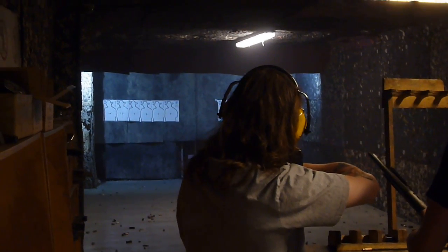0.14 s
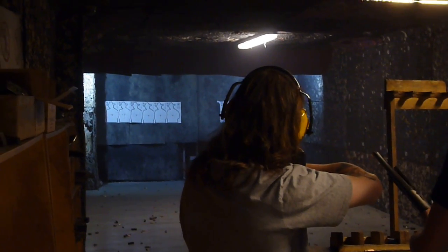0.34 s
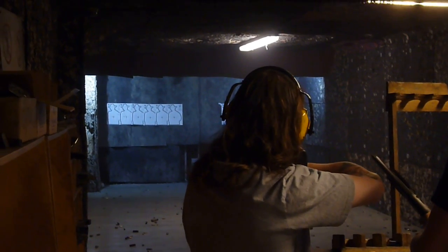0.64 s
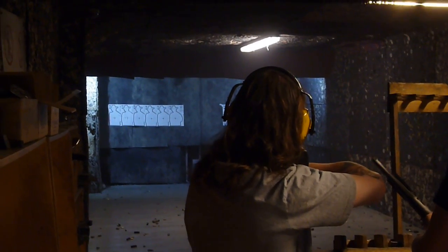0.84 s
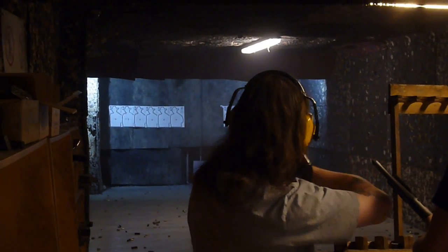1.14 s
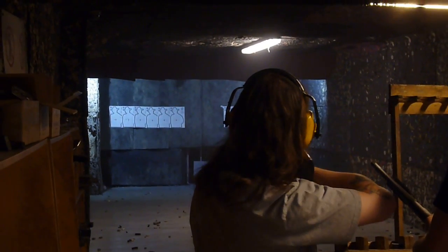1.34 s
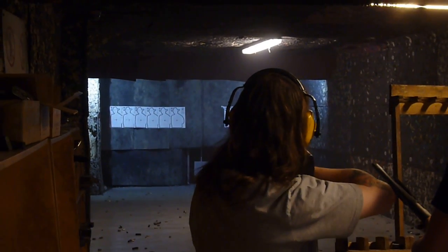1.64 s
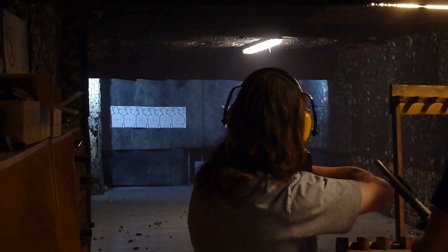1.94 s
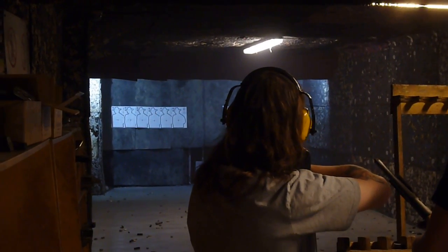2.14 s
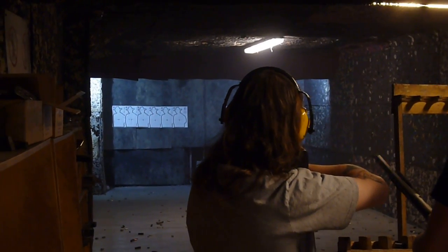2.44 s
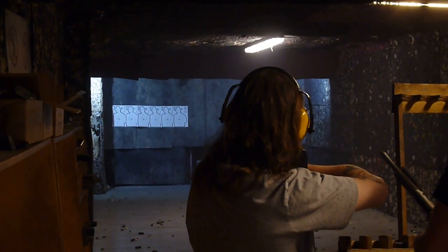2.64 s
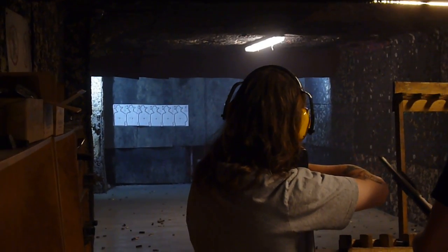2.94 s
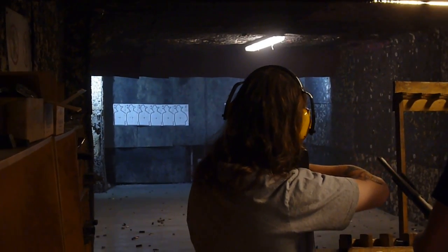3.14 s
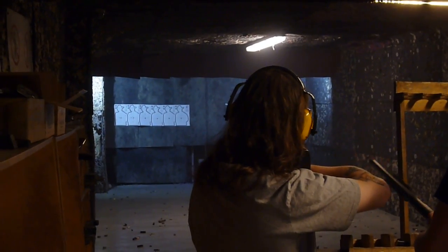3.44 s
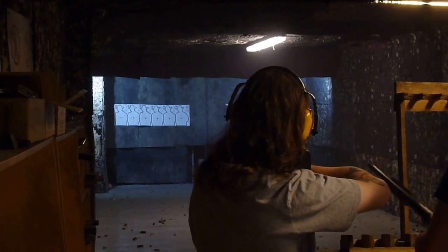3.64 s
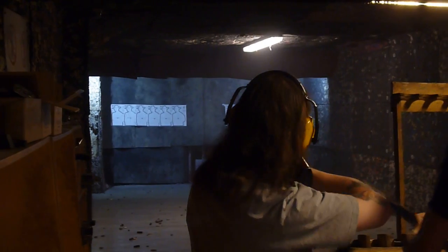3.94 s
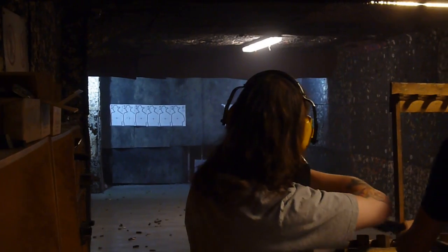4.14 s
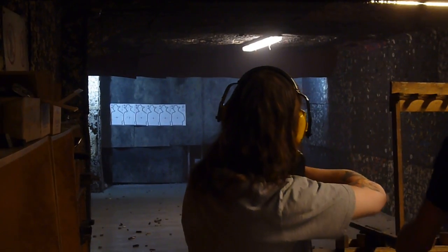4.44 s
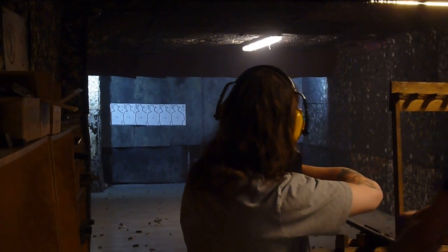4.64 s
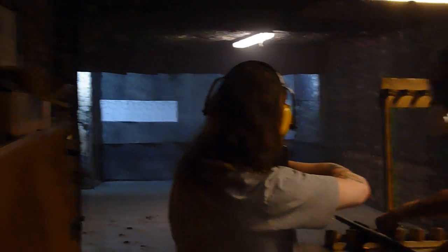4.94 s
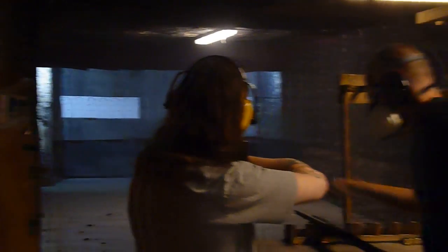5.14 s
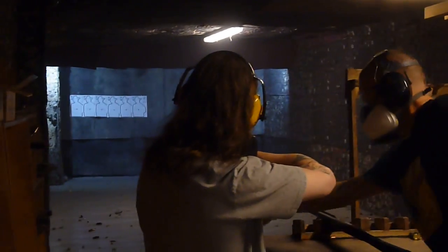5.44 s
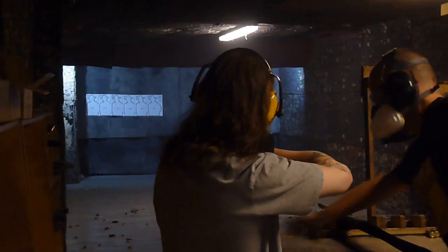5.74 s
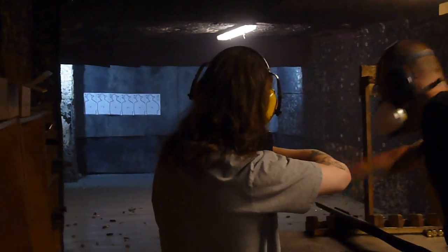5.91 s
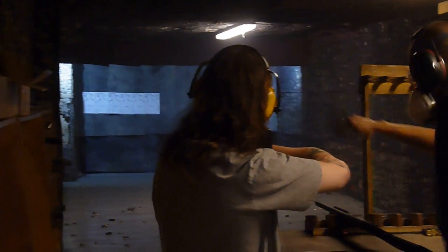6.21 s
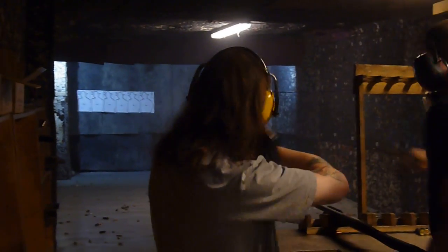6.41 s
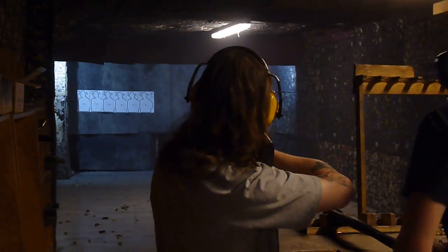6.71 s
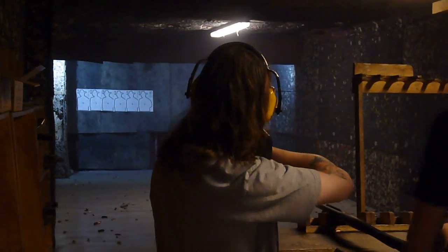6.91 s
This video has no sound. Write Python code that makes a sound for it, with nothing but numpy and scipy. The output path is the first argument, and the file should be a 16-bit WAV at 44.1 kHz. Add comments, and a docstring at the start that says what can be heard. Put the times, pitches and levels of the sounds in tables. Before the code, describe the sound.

In a low concrete shooting range, light metal ticks lead into two overlapping gunshots around one second. Clacks and bouncing cases follow, then three single shots, each with a short boxy echo. Ventilation rumbles beneath. A small overloaded microphone clips the blasts, ducks everything afterward and slowly recovers, with faint hiss and dull treble.

```python
"""Shooting range, five shots

Five shots from two stands in a low concrete range, among bouncing cases and the clack of gun parts.
Shots are banded noise with standing waves; clacks are bursts of tiny contacts with ringing metal.
Ventilation rumbles underneath as wavering bands of noise.
The blast drives a small microphone into its rails; a bass cut, a gain control that recovers slowly
and a faint hiss follow."""
import sys
import numpy as np
from scipy import signal
from scipy.io import wavfile

SR = 44100
rng = np.random.default_rng(int(sys.argv[2]) if len(sys.argv) > 2 else 0)


def transcribe(u):
    """Save the signal u as a 16-bit wav file named by the first command-line argument.

    u: samples, shape (n,) or (channels, n), limited to [-1, 1]; the rate is SR.
    q: integer samples, one column per channel.
    """
    v = np.clip(np.atleast_2d(u).T, -1, 1)
    q = np.round(v * 32767).astype(np.int16)
    wavfile.write(sys.argv[1], SR, q)


N = 311787

# The shots. Each row: start in seconds, level in dB above the microphone's rails, stand (0 or 1).
SHOTS = [(0.9552, 21, 0), (1.085, 15.5, 1), (3.7578, 16.5, 0), (4.999, 14.5, 1), (6.279, 19, 0)]
# How the range answers a blast. Each row: frequency in Hz, relative level in dB per Hz,
# 60 dB decay time in seconds, build-up in seconds.
RANGE_ANSWER = [(29, -20.5, 1.9, 0.024), (55, -16, 0.68, 0.019), (81, -8, 1.73, 0.023),
                (122, -3, 1.03, 0.016), (203, 0, 0.66, 0.019), (210, -5.5, 0.61, 0.037),
                (286, -4.5, 0.73, 0.032), (403.5, 7.5, 0.43, 0.035), (536, 9, 0.3, 0.061),
                (697, 4.5, 0.28, 0.037), (972, -3, 0.28, 0.014), (2080, -9, 0.19, 0.0078),
                (4500, -21, 0.24, 0.00027), (9300, -21, 0.16, 0.00085)]
# Standing waves of the range. Each row: frequency in Hz, level in dB, 60 dB decay time in seconds.
STANDING_WAVES = [(36.2, -34.5, 1.9), (82.33, -9, 1.45), (142.3, -18, 1.2), (185.8, -15, 0.97),
                  (268, -22, 0.51), (305.3, -18.5, 0.82), (374, -21.5, 0.93), (400, -12.5, 0.58),
                  (458.8, -11.5, 0.62)]
# Cases and gun parts striking. Each row: start in seconds, level in dB, brightness in dB per octave,
# pitch struck in Hz, ringing in dB, 60 dB decay time in seconds.
CLACKS = [(0.123, -37.5, 5.5, 3260, 4.5, 0.25), (0.194, -29.5, 5, 2920, -1, 0.21),
          (0.2075, -22, 1.5, 3020, 5, 0.06), (0.274, -41, 6, 4900, -4, 0.044),
          (0.328, -38, 3, 4940, 2, 0.13), (0.377, -30.5, -5, 1270, 2.5, 0.065),
          (0.616, -30.5, 4, 4900, -7, 0.33), (0.636, -17.5, 4, 2100, 0, 0.086),
          (0.728, -31.5, 9, 3500, 6, 0.1), (0.748, -31, 12.5, 6300, -9, 0.11),
          (0.807, -27, 1.5, 3460, 0, 0.078), (1.498, -20.5, -4.5, 1900, 22, 0.055),
          (1.5928, -1, -6, 1280, -3, 0.11), (1.658, -22, -6, 1290, -5, 0.14),
          (1.901, -10.5, -4.5, 1920, 6.5, 0.099), (1.975, 2.5, -0.5, 3430, -7, 0.12),
          (2.04, -22.5, -5, 1280, 2, 0.25), (2.107, -17.5, -0.5, 2350, 2, 0.061),
          (2.256, -14, -2.5, 1450, 7, 0.081), (2.339, -14.5, -1.5, 2720, 5.5, 0.21),
          (2.4692, -15.5, -0.5, 3360, 6.5, 0.17), (2.5555, -16.5, -4, 2260, 1, 0.19),
          (2.652, -25, 0.5, 3080, 0.5, 0.18), (2.816, -35, 0.5, 2200, 7, 0.099),
          (2.867, -41.5, 1.5, 4900, -2, 0.08), (2.932, -39, -1.5, 2300, -1, 0.085),
          (3.057, -42, -3, 2100, 0, 0.43), (3.127, -24, 5, 3820, 3, 0.14), (3.354, -30, -2, 1300, -6, 0.11),
          (3.47, -41, 2, 2300, -4, 0.17), (3.521, -14.5, 3.5, 1960, -4, 0.12),
          (3.5922, -18.5, 2.5, 2060, -11, 0.13), (3.7242, -26.5, 1, 2040, -5, 0.14),
          (4.232, -12, -2.5, 6600, -4, 0.15), (4.31, -8.5, -2.5, 3430, -3, 0.13),
          (4.389, -11.5, -0.5, 730, 13, 0.17), (4.506, -11, -3, 795, 2, 0.18),
          (4.593, -32, 5.5, 2250, 9, 0.16), (4.769, -33.5, 5, 4200, 12, 0.029),
          (4.832, -31, 0, 2220, -1, 0.4), (5.454, -11.5, 4, 2170, 4.5, 0.084),
          (5.823, -29.5, 8, 5000, -9, 0.12), (5.933, -33, 7, 2130, 5, 0.06),
          (6.146, -9.5, 2.5, 1730, 0.5, 0.1), (6.213, -31, 1, 1760, -5, 0.11),
          (6.574, -22, -23, 1280, -0.5, 0.31), (6.699, -7, -5, 2540, 10, 0.13),
          (6.801, -4.5, -0.5, 4200, 8, 0.17)]
# What the metal parts ring with. Each row: frequency in Hz, level in dB, 60 dB decay time in seconds.
METAL_MODES = [(535, 0.5, 0.2), (720, -8.5, 0.099), (1263, -9, 0.27), (1400, -12, 0.45), (1788, -11, 0.47),
               (2050, -6, 0.033), (2245, -10, 0.34), (2625, -18, 0.42), (3475, -13, 0.098),
               (3790, -15, 0.16), (4980, -6, 0.031), (6500, -3, .08), (7400, -14, 0.073)]
# Bands of the contact noise. Each row: low edge in Hz, high edge in Hz, nominal centre in Hz, level in dB.
GRIT_BANDS = [(600, 2000, 1100, -3), (1600, 4500, 2700, 0), (3500, 9000, 5700, -3)]
# Colour of the ventilation. Each row: frequency in Hz, relative level in dB per Hz.
VENT_COLOUR = [(26, -29.5), (45, -1.5), (54, 1), (103, 14.5), (229, -10), (310, -13.5), (361, -10.5),
               (568, -10), (1240, -20.5), (2100, -22), (3300, -36), (6730, -34), (8000, -43.5),
               (10400, -67), (17600, -120)]
# How the ventilation rumble wavers. Each row: time in seconds, level in dB.
VENT_LEVEL = [(0, -34.5), (.5, -30), (0.901, -29.5), (2.2, -24.5), (2.8, -28), (3.1, -32), (3.399, -29.5),
              (3.698, -28), (4.799, -25), (6, -27), (7.07, -24)]

# Treble comes back from the far wall.
FAR_WALL_S, FAR_WALL_DB, FAR_WALL_HZ = 0.049, -10.5, 900
# Capsule sag: size, build-up, half swing, holding time, letting-go time.
SAG_DB, SAG_RISE_S, SAG_SWING_S, SAG_HOLD_S, SAG_FADE_S = 0.5, 0.0025, 0.1091, 0.14, 0.022
# The burst of contacts comes in clumps.
CLUMPS_PER_S, CLUMP_SPREAD_DB = 350, 1.5
# Modes away from the struck pitch ring less; every strike also has its own chance.
AWAY_DB_PER_OCTAVE, AWAY_MAX_DB, STRIKE_SPREAD_DB = 18, 21.0, 2
RING_SHARPNESS = 16  # grows with the ring's decay time
RAIL = 12.7  # largest swing of the microphone, full scale = 1
BASS_CUT_HZ, BASS_CUT_Q = 237, 1.303
PREAMP_TOP, PREAMP_KNEE = 8.03, 12
# The slow leak past the bass cut.
LEAK_LOW_HZ, LEAK_TOP_HZ, LEAK_SHARE = 5.1, 22.4, 0.78
HOLD_DB, RECOVER_DB_PER_S, ATTACK_S, AHEAD_S = -10.5, 19, 0.0004, 0.0036
HISS_DB = -62.5
NOTCH_HZ, NOTCH_WIDTH_HZ = 4390, 70
CAPSULE_TOP_HZ, TOP_CUT_HZ = 7300, 8850
OFFSET = 0.018


def shots():
    """Each stand has one answer of the range, heard again at every shot; the blast also sags the capsule."""
    out = np.zeros(N)
    t = np.arange(2 * SR) / SR
    answers = range_answer(t)
    sag = capsule_sag(t)
    for start, over_db, stand in SHOTS:
        blast = answers[int(stand)] - sag
        add(out, start, RAIL * from_db(over_db) * blast)
    return out


def range_answer(t):
    """Noise bands build up and decay, treble returns from the far wall, and standing waves ring; per stand."""
    answer = 0
    since_wall = np.maximum(t - FAR_WALL_S, 0)
    for hz, noise in bands(len(t), channels=2):
        level_db, t60, rise = at_hz(RANGE_ANSWER, hz)
        wall_gain = from_db(FAR_WALL_DB) * hz / (hz + FAR_WALL_HZ)
        back = wall_gain * swell(since_wall, 0.024, t60)
        answer = answer + from_db(level_db) * (swell(t, rise, t60) + back) * noise
    # The first 100 ms of noise set the level.
    answer /= np.sqrt(np.mean(answer[:, :SR // 10] ** 2, axis=1, keepdims=True))
    phases = rng.uniform(0, 2 * np.pi, (len(STANDING_WAVES), 2, 1))
    for (hz, level_db, t60), phase in zip(STANDING_WAVES, phases):
        answer += from_db(level_db) * swell(t, 0.17, t60) * np.sin(2 * np.pi * hz * t + phase)
    return answer


def capsule_sag(t):
    """The capsule's rest point is pushed down by a blast, swings past the middle and lets go."""
    push = 1 - np.exp(-t / SAG_RISE_S)
    swing = np.cos(np.pi * t / SAG_SWING_S)
    let_go = (1 - np.tanh((t - SAG_HOLD_S) / SAG_FADE_S / 2)) / 2
    return from_db(SAG_DB) * push * swing * let_go


def clacks():
    """Bursts of tiny contacts with a short booth tail, and metal modes; long scrapes start softly."""
    out = np.zeros(N)
    t = np.arange(SR // 3) / SR
    filters = [signal.butter(2, [low, high], "band", fs=SR, output="sos") for low, high, _, _ in GRIT_BANDS]
    for start, level_db, bright, pitch_hz, ring_db, t60 in CLACKS:
        grit = contact_grit(t)
        burst = 0
        for (_, _, hz, db), sos in zip(GRIT_BANDS, filters):
            tilt_db = bright * np.log2(hz / GRIT_BANDS[1][2])  # pivots on the middle band
            burst = burst + from_db(db + tilt_db) * rms_one(signal.sosfilt(sos, grit))
        booth_tail = from_db(-29.0) * swell(t, 0.01, 0.048)
        shape = swell(t, 0.27 * t60 ** 2, t60) + booth_tail
        sound = shape * burst + metal_ring(t, pitch_hz, ring_db, t60)
        add(out, start, from_db(level_db) * sound)
    return out


def contact_grit(t):
    """Tiny contacts of very uneven strength, swelling and thinning in clumps."""
    grit = rng.standard_normal(len(t)) * from_db(7.44 * rng.standard_normal(len(t)))
    clumps = rng.standard_normal(SR // 40)
    clump_db = CLUMP_SPREAD_DB * np.interp(t * CLUMPS_PER_S, np.arange(len(clumps)), clumps)
    return grit * from_db(clump_db)


def metal_ring(t, pitch_hz, ring_db, t60):
    """The metal's modes ring most near the struck pitch."""
    ring = np.zeros(len(t))
    for (hz, mode_db, mode_t60), chance in zip(METAL_MODES, rng.standard_normal(len(METAL_MODES))):
        away_db = min(AWAY_DB_PER_OCTAVE * abs(np.log2(hz / pitch_hz)), AWAY_MAX_DB)
        level_db = ring_db + mode_db - away_db + STRIKE_SPREAD_DB * chance
        damped_t60 = np.sqrt(mode_t60 * t60)  # a short knock is also a damped one
        ring += from_db(level_db) * rough_ring(hz, damped_t60, t)
    return ring


def rough_ring(hz, t60, t):
    """Rattling contact keeps one resonance shaking: a rough band, narrower where it rings long."""
    sharpness = RING_SHARPNESS * (1 + t60 / 0.2)
    r = np.exp(-np.pi * hz / sharpness / SR)
    w = 2 * np.pi * hz / SR
    rough = signal.lfilter([1, 0, -1], [1, -2 * r * np.cos(w), r * r], rng.standard_normal(len(t)))
    return rms_one(rough) * swell(t, 0.00052, t60)


def ventilation():
    """Air noise whose bands waver partly together."""
    air = 0
    together = drift(3.5)
    for hz, noise in bands(N, channels=1):
        band_db = at_hz(VENT_COLOUR, hz)[0] + 0.46 * together + 0.19 * drift(5)
        air = air + from_db(band_db) * noise[0]
    level_db = np.interp(np.arange(N) / SR, *np.transpose(VENT_LEVEL))
    return from_db(level_db) * rms_one(air)


def from_db(db):
    """Decibels to gain."""
    return 10 ** (np.asarray(db) / 20)


def rms_one(x):
    """Scale to rms 1."""
    return x / np.sqrt(np.mean(x ** 2) + 1e-20)


def at_hz(rows, hz):
    """All columns of a table at one frequency, on a log axis."""
    f, *columns = np.transpose(rows)
    return [np.interp(np.log(hz), np.log(f), column) for column in columns]


def bands(size, channels):
    """Third-octave bands of noise with their centres; neighbours are unrelated."""
    white = rng.standard_normal((2, channels, size))
    edges = 25 * 2 ** (np.arange(27) / 3)
    for k, (low, high) in enumerate(zip(edges, edges[1:])):
        sos = signal.butter(2, [low, high], "band", fs=SR, output="sos")
        yield np.sqrt(low * high), signal.sosfilt(sos, white[k % 2])


def swell(t, rise, t60):
    """Builds up, then dies away exponentially."""
    return (1 - np.exp(-t / max(rise, 1e-4))) * from_db(-60 * t / t60)


def drift(rate_hz):
    """Slow chance with spread 1, drawn at 40 points a second and joined by lines."""
    points = rng.standard_normal(int(N / SR * 40) + 2)
    r = np.exp(-2 * np.pi * rate_hz / 40)
    slow = rms_one(signal.lfilter([1], [1, -r], points))
    return np.interp(np.arange(N) / SR * 40, np.arange(len(points)), slow)


def add(out, start, x):
    """Mix x into out from a start in seconds."""
    i = round(start * SR)
    out[i:i + len(x)] += x[:N - i]


def scene():
    """Everything that reaches the microphone."""
    return (shots() + clacks() + ventilation())[None]


def gain_control(x, leak):
    """Peaks above the hold level pull the gain down fast; it climbs back steadily and ignores the slow leak."""
    climb_db = RECOVER_DB_PER_S * np.arange(N) / SR
    over_db = np.maximum(20 * np.log10(np.abs(x) + 1e-9) - HOLD_DB, 0)
    cut_db = np.maximum.accumulate(over_db + climb_db) - climb_db
    r = np.exp(-1 / (ATTACK_S * SR))
    cut_db = signal.lfilter([1 - r], [1, -r], cut_db)
    # It looks slightly ahead.
    cut_db = np.interp(np.arange(N) + AHEAD_S * SR, np.arange(N), cut_db)
    return (x + leak) * from_db(-cut_db)


def slow_leak(railed):
    """The lowest swings that slip past the bass cut, as a band between two slow cutoffs."""
    w = 2 * np.pi * LEAK_LOW_HZ
    leak = signal.lfilter(*signal.bilinear([1, 0, 0], [1, 3.6 * w, w ** 2], SR), railed)
    return LEAK_SHARE * signal.lfilter(*signal.butter(1, LEAK_TOP_HZ, fs=SR), leak)


def record(dry):
    """Rails, a bass cut with a slow leak, gain control, hiss, a narrow notch, the top cut and an offset."""
    railed = RAIL * np.tanh(dry[0] / RAIL)
    w = 2 * np.pi * BASS_CUT_HZ
    x = signal.lfilter(*signal.bilinear([1, 0, 0], [1, w / BASS_CUT_Q, w * w], SR), railed)
    # The preamplifier rounds the largest swings.
    x = x / (1 + np.abs(x / PREAMP_TOP) ** PREAMP_KNEE) ** (1 / PREAMP_KNEE)
    x = gain_control(x, slow_leak(railed))
    x = x + from_db(HISS_DB) * rng.standard_normal(N)
    x = signal.lfilter(*signal.iirnotch(NOTCH_HZ, NOTCH_HZ / NOTCH_WIDTH_HZ, SR), x)
    # The capsule rolls off first, then the steep top cut.
    x = signal.sosfilt(signal.butter(4, CAPSULE_TOP_HZ, fs=SR, output="sos"), x)
    x = signal.sosfilt(signal.cheby2(12, 45, TOP_CUT_HZ, fs=SR, output="sos"), x)
    return x[None] + OFFSET


dry = scene()
out = record(dry)
transcribe(out)
```